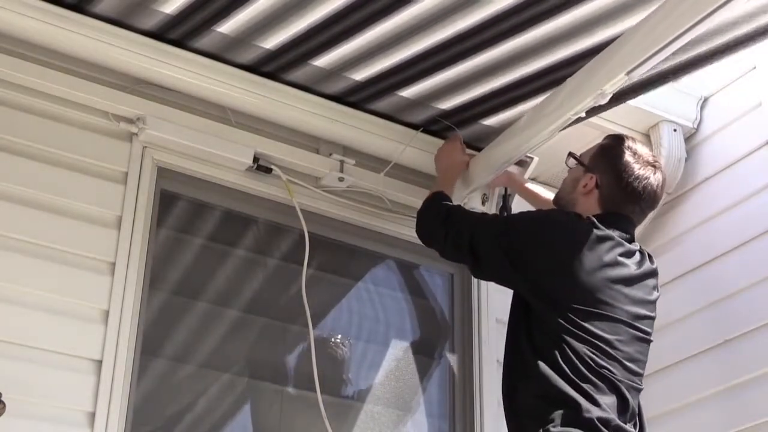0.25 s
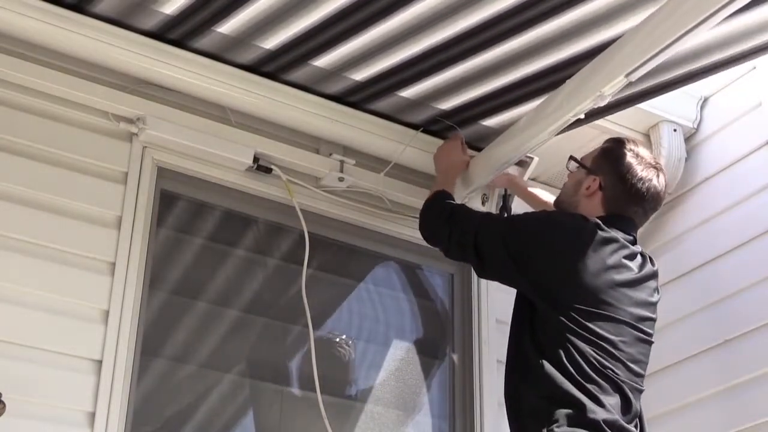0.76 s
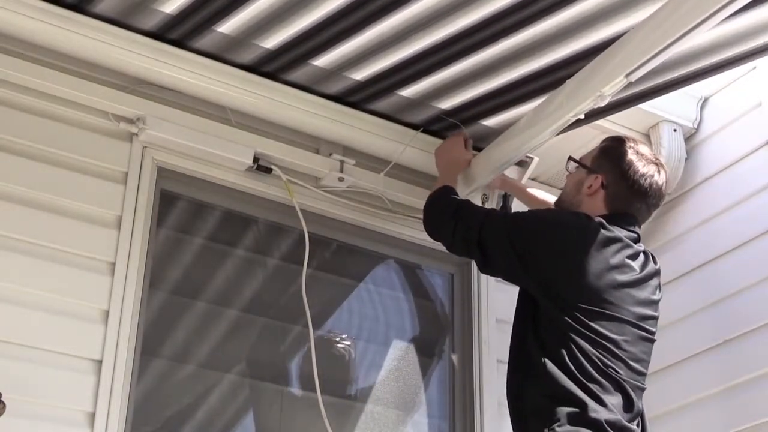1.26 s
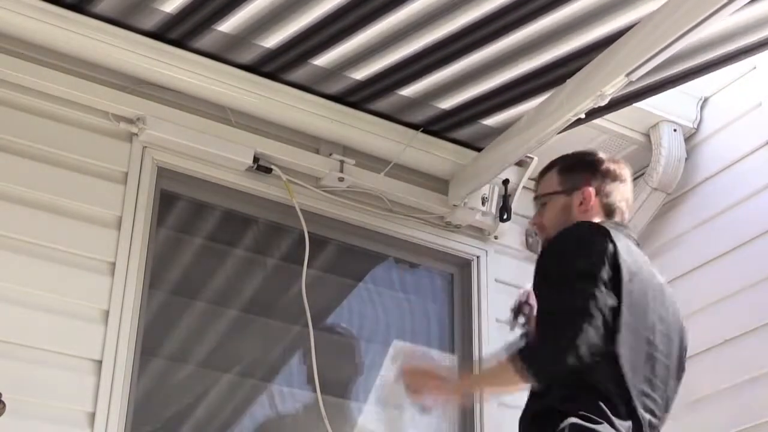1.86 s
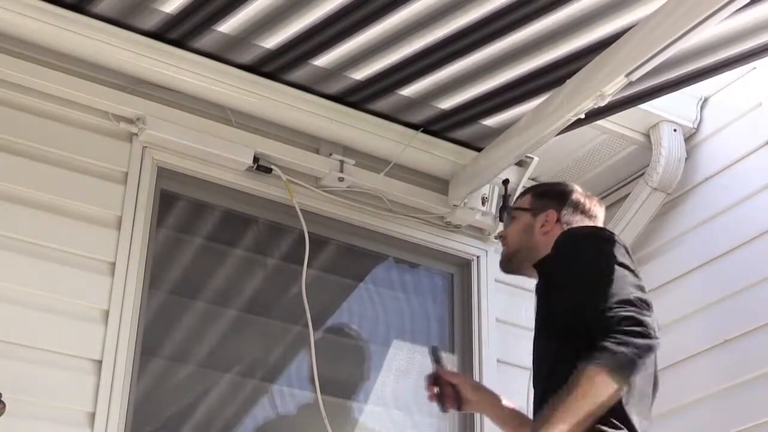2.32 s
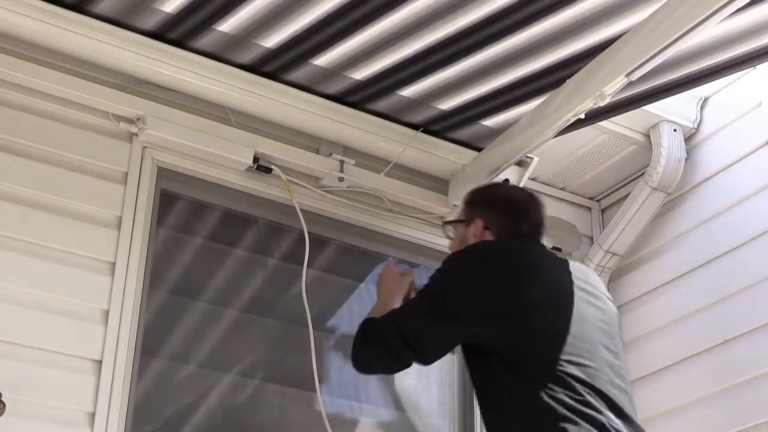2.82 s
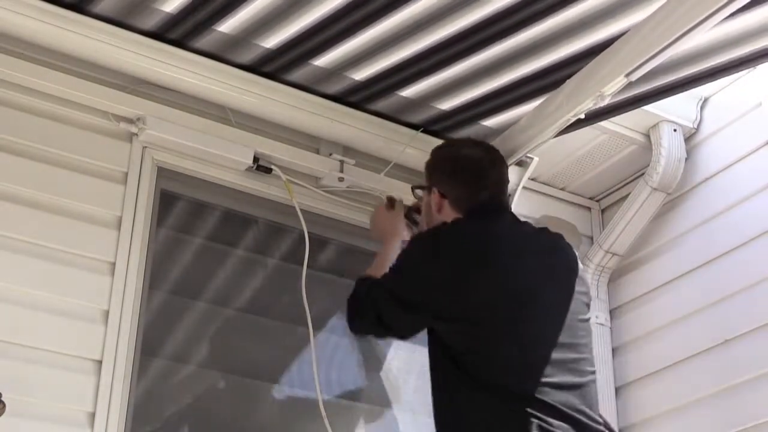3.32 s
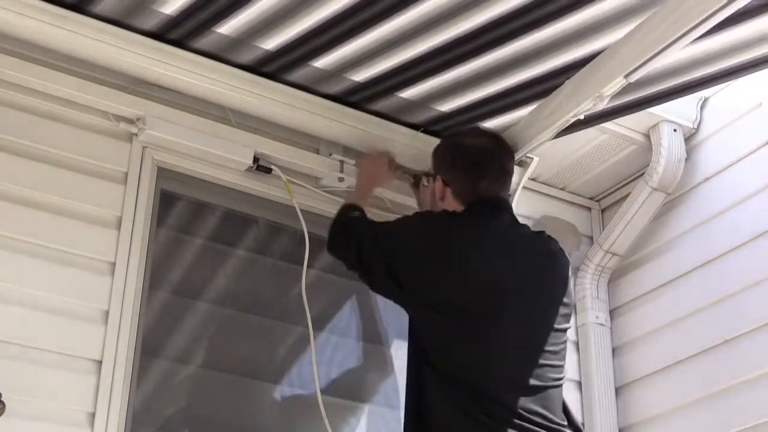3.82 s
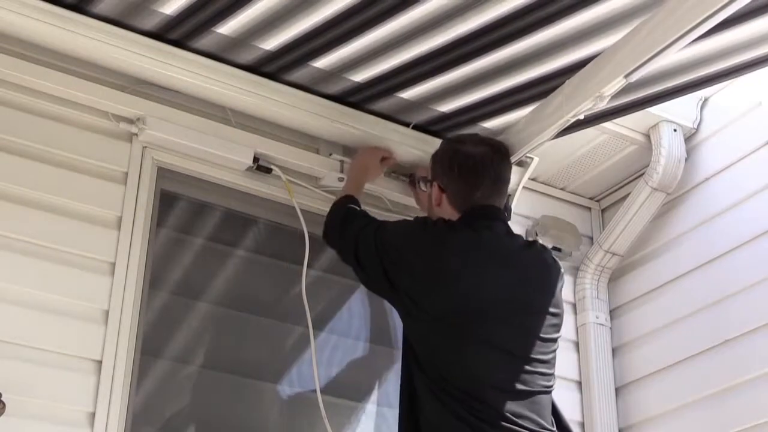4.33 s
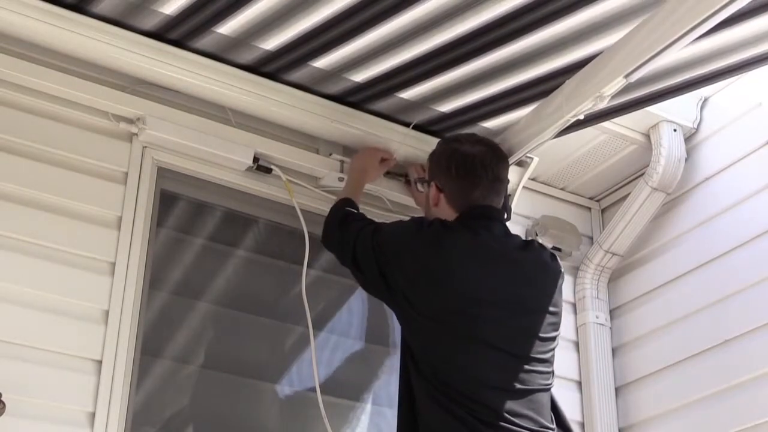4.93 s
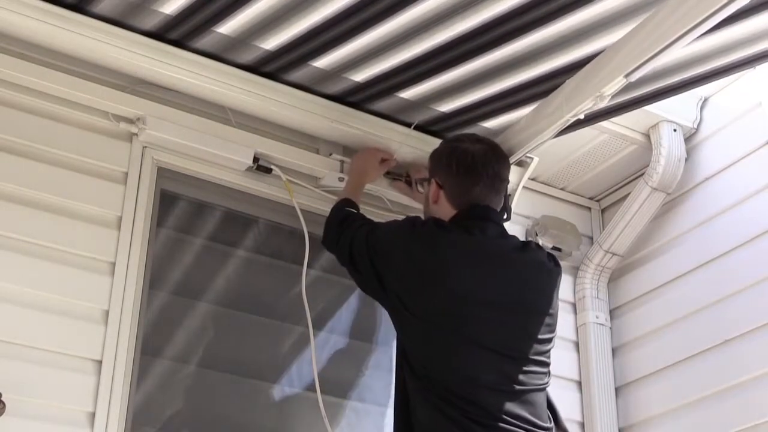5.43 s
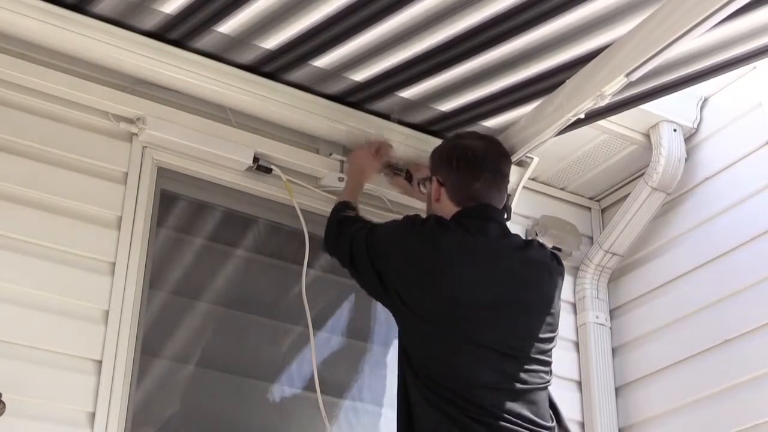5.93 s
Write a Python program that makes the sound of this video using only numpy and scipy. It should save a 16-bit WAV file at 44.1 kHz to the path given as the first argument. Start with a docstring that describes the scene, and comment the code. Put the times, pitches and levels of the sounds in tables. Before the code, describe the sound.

Two sharp, loud snips of plastic ties outdoors, with small handling ticks between them, gusts rumbling on the microphone and faint chirping birds.

```python
"""Cutting plastic ties under an awning

Side cutters snip two ties: noise for the bite, a filtered click for the crack, ringing modes for jaws and trim.
Hands, cable and feet make small taps and scuffs, each a tick with a burst of friction noise.
Wind buffets the microphone ports as shaped noise; flaps and low ringing kicks go with it.
Gliding sines whistle as birds over a blurred far chorus, faint drones, a brief hum and hissing open air."""
import sys
import numpy as np
from scipy import signal
from scipy.fft import rfft, irfft
from scipy.io import wavfile

SR = 44100
rng = np.random.default_rng(int(sys.argv[2]) if len(sys.argv) > 2 else 0)


def digitize_waveform(pressure):
    """Quantize a signal to 16-bit integers and store it at the path in sys.argv[1].

    Rows of a 2-D input are taken as channels; values are limited to [-1, 1].
    """
    field = np.atleast_2d(pressure).T
    bounded = np.clip(field, -1, 1)
    quanta = np.round(bounded * 32767).astype(np.int16)
    wavfile.write(sys.argv[1], SR, quanta)


N = 272097
PORCH_T60_S = 0.22
OPPOSITE = np.array([[1], [-1]])   # left and right in opposite sign


def from_db(db):
    """Decibels to gain."""
    return 10 ** (np.asarray(db) / 20)


def rms_one(x):
    """Scale to rms 1."""
    return x / np.sqrt(np.mean(x ** 2) + 1e-20)


def in_time(rows):
    """Interpolate table columns into sample-rate curves; the first column is time in seconds."""
    s, *columns = np.transpose(rows)
    return [np.interp(np.arange(N) / SR, s, c) for c in columns]


def at_hz(points, hz):
    """Read a spectrum on a log-frequency axis."""
    points_hz, values = np.transpose(points)
    return np.interp(np.log(np.maximum(hz, 1)), np.log(points_hz), values)


def coloured(x, spectrum):
    """Give a signal a spectrum without shifting its phase."""
    hz = np.fft.rfftfreq(x.shape[-1], 1 / SR)
    return irfft(rfft(x) * from_db(at_hz(spectrum, hz)), x.shape[-1])


def causal(x, spectrum):
    """Give a click a spectrum with nothing sounding early (minimum phase, by folding the cepstrum)."""
    hz = np.fft.rfftfreq(len(x), 1 / SR)
    cepstrum = irfft(np.log(from_db(at_hz(spectrum, hz))), len(x))
    cepstrum[1:len(x) // 2] *= 2
    cepstrum[len(x) // 2 + 1:] = 0
    return irfft(rfft(x) * np.exp(rfft(cepstrum)), len(x))


def band(x, low_hz, high_hz):
    """Band-pass."""
    edges = [low_hz, min(high_hz, .45 * SR)]
    return signal.sosfilt(signal.butter(2, edges, "band", fs=SR, output="sos"), x)


def drift(rate_hz):
    """Slow chance of rms 1: noise smoothed by two equal poles, at one fortieth of the sample rate."""
    r = np.exp(-80 * np.pi * rate_hz / SR)
    noise = rng.standard_normal(N // 40 + 2002)
    slow = signal.lfilter([1], [1, -2 * r, r * r], noise)[2000:]
    return np.interp(np.arange(N) / 40, np.arange(len(slow)), rms_one(slow))


def ring(x, hz, t60_s):
    """A two-pole resonance: a unit click sets a sine of starting height 1 ringing."""
    r, w = from_db(-60 / (t60_s * SR)), 2 * np.pi * hz / SR
    return signal.lfilter([0, np.sin(w)], [1, -2 * r * np.cos(w), r * r], x + 1e-18)


def porch(x, t60_s, tail_db, side_db, ragged_db=4.0):
    """Ribbed siding scatters each echo into a few ms of uneven grit; the dense tail fades ever faster."""
    # corner, floor, far wall, then their repeats: delay_s, level_db (before the tail level and 16.5 dB)
    echoes = [(0, -14.5), (0.0105, -18.5), (0.027, -29.5), (0.042, -37), (0.066, -53)]
    # echoes are more unlike at the two ports in the treble: frequency_hz, side_weight_db
    width = [(200, -24.5), (700, -4), (2400, -4.5), (4400, 1), (15000, 0)]
    t = np.arange(int(.5 * SR)) / SR
    envelope = from_db(tail_db - 60 * t / t60_s - 1600 * t ** 2)
    for delay_s, db in echoes:
        envelope += (t >= delay_s) * from_db(db + tail_db + 16.5) * np.exp(-np.abs(t - delay_s) / 0.0047)
    sizes = from_db(ragged_db * np.minimum(rng.exponential(1, len(t)), 4))
    mid, side = rng.standard_normal((2, len(t))) * rms_one(sizes) * envelope
    mid[0], side[0] = 1, 0   # the direct sound
    response = mid + from_db(side_db) * coloured(side, width) * OPPOSITE
    return signal.fftconvolve(np.atleast_2d(x), response, axes=1)[:, :N]


def whistle(rows, waver):
    """A near sine glides quickly, then settles on its last pitch, with soft ends and a slight waver."""
    attack_s, release_s = 0.0035, 0.0055
    fall_settle, rise_settle = 2.2, 1.2   # above 1, a glide is quick at first and levels off
    swell_db = 4   # a note starts this much softer than it ends
    out = np.zeros(N)
    wobble, flutter_db = drift(76), 0.94 * drift(38)
    for s, length_s, first_hz, last_hz, db in rows:
        t = np.arange(round(length_s * SR)) / SR
        span = slice(round(s * SR), round(s * SR) + len(t))
        ends = np.clip(np.minimum(t / attack_s, (length_s - t) / release_s), 0, 1)
        settle = fall_settle if first_hz > last_hz else rise_settle
        hz = last_hz + (first_hz - last_hz) * (1 - t / length_s) ** settle
        phase = 2 * np.pi * np.cumsum(hz * (1 + waver * wobble[span])) / SR
        level = from_db(db - swell_db * (0.5 - t / length_s) + flutter_db[span])
        out[span] += np.sqrt(2) * ends * level * np.sin(phase)
    return out


def air(wash_db, hiss_db):
    """Open air: half-octave bands of stereo noise; low bands follow the wash, high bands the hiss."""
    # stereo width of the low air, narrower early on: start_s, side_db
    low_width = [(0, -5), (0.9, -6), (1.1, 3), (1.5, -15), (2, -1.5), (2.6, 1), (3.4, 5.5), (4, 7),
                 (4.9, 7), (5.1, 4.5), (6.17, 7)]
    # colour of the air: frequency_hz, density_db (per Hz)
    air_colour = [(24, -41), (40, -8.5), (91, -20.5), (290, -8), (354, -3), (516, -3.5), (1070, -2),
                  (1590, -4.5), (2440, -5.5), (3300, -6), (3560, -7.5), (12100, -21.5), (14300, -30),
                  (14900, -50), (15500, -74.5)]
    # left-right likeness: frequency_hz, likeness (1 is identical)
    likeness = [(60, 0.89), (150, 0.97), (380, 1), (650, 0.93), (950, 0.74), (2380, 0.57), (5980, 0.02),
                (15000, 0.84)]
    top_hz = 14700   # the hiss ends here
    out, edges_hz = 0, 40 * 2 ** np.arange(0, 9.1, .5)
    white, (low_side_db,) = rng.standard_normal((2, 2, N)), in_time(low_width)
    for k, (low_hz, high_hz) in enumerate(zip(edges_hz, edges_hz[1:])):
        mid, side = band(white[k % 2], low_hz, high_hz)
        hz = np.sqrt(low_hz * high_hz)
        alike = np.clip(at_hz(likeness, hz), -1, 1)
        share = np.clip(np.log2(hz / 1500) / 2.1, 0, 1)   # 0 follows the wash, 1 the hiss
        level_db = (1 - share) * (wash_db + 11.0) + share * (hiss_db + 18.0)
        gain = from_db(at_hz(air_colour, hz) + level_db + 1.48 * drift(15.0))
        side = from_db((1 - share) * low_side_db) * side * OPPOSITE
        out = out + gain * (np.sqrt(1 + alike) * mid + np.sqrt(1 - alike) * side)
    return signal.sosfilt(signal.butter(10, top_hz, fs=SR, output="sos"), out)


def drones():
    """Faint drones in the air: noise through narrow resonances, each swelling on its own."""
    # pitch_hz, width_hz, level_db (rms, before the swell)
    drone_bands = [(338, 9.6, -67), (452, 19, -77.5), (630, 12, -70.5), (729.6, 8.7, -71.5),
                   (950, 2.8, -75.5)]
    swell_db = 3
    out = 0
    for hz, width_hz, db in drone_bands:
        tone = rms_one(ring(rng.standard_normal(N), hz, 2.0 / width_hz))
        out = out + from_db(db + swell_db * drift(11.0)) * tone
    return out


def hum():
    """A faint low hum comes and goes: a near sine, almost steady in pitch."""
    # start_s, length_s, first_pitch_hz, last_pitch_hz, level_db (rms, around which it swells)
    hum_notes = [(3.87, 0.28, 242, 241, -56.5)]
    return whistle(hum_notes, waver=0.0032)


def chorus(level_db):
    """Many far birds: ten warbling sines swell and fade by chance, blurred by distance."""
    voices = 0
    for hz in (2057, 2216, 2380, 2480, 2526, 2680, 2790, 2890, 3120, 3300):
        swell = from_db(5.2 * drift(24.0))
        warble = 1 + .14 * np.tanh(.6 * drift(13))
        voices = voices + swell * np.sin(2 * np.pi * np.cumsum(hz * warble) / SR)
    return from_db(level_db - 3.0) * rms_one(porch(voices, t60_s=0.79, tail_db=-4.0, side_db=-4.0))


def birds():
    """Songbirds whistle gliding notes, heard directly and through a longer scattered echo."""
    # start_s, length_s, first_pitch_hz, last_pitch_hz, level_db (rms, direct, around which it swells)
    bird_notes = [(0.011, 0.018, 3730, 3350, -57), (0.021, 0.024, 3500, 2640, -51),
                  (0.033, 0.037, 2630, 2614, -43.5), (0.056, 0.035, 2610, 2364, -48.5),
                  (0.068, 0.011, 2380, 2130, -53), (0.07, 0.027, 2640, 2620, -57),
                  (0.076, .026, 2380, 2400, -55), (0.089, 0.016, 2770, 3200, -49),
                  (0.1, 0.046, 3104, 2977, -45.5), (0.136, 0.021, 3020, 3680, -47),
                  (0.18, 0.054, 1916, 2000, -60), (0.232, 0.017, 2800, 2700, -63),
                  (0.285, 0.027, 2640, 2670, -55), (0.312, 0.037, 2480, 2680, -64),
                  (0.315, 0.031, 2380, 2390, -59), (1.145, 0.028, 2310, 2330, -61),
                  (1.175, 0.13, 2610, 2590, -65), (1.735, .035, 1890, 1910, -69),
                  (1.755, 0.023, 3120, 3170, -57), (1.81, 0.034, 2060, 2180, -73),
                  (1.85, 0.03, 2220, 2400, -56.5), (1.878, 0.048, 2410, 2450, -61),
                  (1.86, 0.038, 3760, 3840, -63), (1.945, 0.033, 2690, 2550, -56.5),
                  (1.98, 0.044, 2730, 2880, -60), (2.03, .035, 2270, 2460, -57),
                  (2.035, .045, 3300, 3220, -64), (2.09, 0.021, 2650, 2510, -61),
                  (2.215, 0.028, 2950, 3050, -64), (2.255, 0.023, 3170, 3250, -66),
                  (1.935, 0.13, 2190, 2050, -63), (2.3, 0.027, 2700, 2760, -59),
                  (2.325, 0.085, 2790, 2922, -50), (2.4, 0.027, 2990, 2600, -56),
                  (2.383, 0.033, 3410, 3700, -52), (2.415, 0.031, 3580, 3740, -51),
                  (2.415, 0.044, 2480, 2140, -54.5), (2.47, 0.03, 2160, 2210, -56),
                  (2.485, 0.04, 2520, 3080, -51), (2.52, 0.1, 3100, 2832, -51.5),
                  (2.525, 0.065, 3620, 3010, -54.5), (2.525, 0.051, 2560, 2140, -56),
                  (2.56, .03, 3740, 3760, -62), (2.575, 0.045, 2140, 2300, -56),
                  (2.62, 0.058, 2900, 3110, -56), (2.635, .025, 3970, 4150, -61),
                  (2.68, 0.02, 3570, 3820, -57), (2.705, 0.033, 2450, 2310, -59),
                  (2.875, 0.027, 3500, 3300, -56.5), (2.905, 0.027, 3300, 3060, -65),
                  (2.93, 0.049, 2500, 2720, -56), (2.95, 0.032, 2940, 2940, -56.5),
                  (2.96, 0.025, 2750, 2650, -57), (2.975, 0.021, 3500, 3110, -52),
                  (2.985, .02, 4250, 4330, -65), (3.01, 0.054, 3290, 3540, -53),
                  (3.055, 0.024, 3500, 3870, -56), (3.072, 0.019, 3840, 3430, -57),
                  (3.06, 0.025, 2670, 2630, -54), (3.08, 0.024, 3210, 3340, -55),
                  (3.11, 0.048, 2140, 2170, -66), (3.172, 0.11, 3500, 2837, -53.5),
                  (3.27, 0.038, 2890, 2800, -66), (3.32, 0.017, 2720, 2670, -57),
                  (3.41, 0.081, 2250, 2200, -66), (3.62, .04, 1970, 1940, -63),
                  (3.68, 0.024, 2830, 2680, -64), (3.7, 0.023, 2450, 2320, -61),
                  (3.31, 0.1, 2440, 2330, -62.5), (3.475, 0.034, 2310, 2630, -57),
                  (3.79, 0.028, 3050, 3360, -59.5), (3.8, 0.034, 2380, 2430, -57),
                  (3.89, 0.036, 2190, 2050, -59), (4.015, 0.1, 2040, 2090, -66),
                  (3.875, 0.032, 2780, 3100, -55), (3.905, 0.021, 2800, 2810, -59),
                  (3.935, 0.02, 2950, 2870, -57), (3.97, 0.024, 2970, 3040, -65),
                  (3.995, 0.035, 2480, 2480, -58), (4.04, 0.03, 2480, 2480, -57),
                  (4.035, 0.049, 3100, 2930, -55), (4.105, 0.032, 3010, 3150, -59),
                  (4.118, 0.045, 2480, 2370, -53), (4.19, 0.073, 2420, 2340, -65.5),
                  (4.265, 0.024, 2600, 2480, -59), (4.27, 0.11, 2710, 2820, -69),
                  (4.36, 0.06, 2900, 2580, -62), (4.62, 0.049, 2550, 2750, -67),
                  (4.74, 0.045, 2700, 2540, -65), (4.88, 0.072, 2170, 2380, -63.5),
                  (5.03, 0.022, 2000, 1980, -61), (5.19, 0.044, 3400, 2890, -64),
                  (5.222, 0.053, 2890, 2660, -58.5), (5.32, 0.1, 2840, 2370, -58),
                  (5.37, .04, 2980, 3150, -63), (5.585, 0.048, 3680, 3570, -68),
                  (5.62, 0.024, 2550, 2680, -59), (5.765, 0.022, 2730, 2800, -65),
                  (5.82, 0.025, 2600, 2680, -58)]
    notes = whistle(bird_notes, waver=0.007)
    return notes + from_db(-7.0) * porch(notes, t60_s=0.41, tail_db=-27.0, side_db=2.5)


def buffet_kicks(rows):
    """Each buffet also kicks the membrane, which rings low in four modes of chance size and sign."""
    kick_db, t60_s = -6.5, 0.03
    modes = [(150, -5), (220, 3), (330, -5), (520, -7.5)]   # pitch_hz, level_db
    kicks = np.zeros((4, N))
    for (s, db, _), size in zip(rows, rng.normal(0, 1, (len(rows), 4))):
        kicks[:, round(s * SR)] = from_db(db + kick_db) * size
    knock = sum(from_db(db) * ring(kick, hz, t60_s) for kick, (hz, db) in zip(kicks, modes))
    return band(band(knock, 110, 980), 60, 1060)


def wind():
    """Lumpy rumble and a deep throb common to both ports; higher eddies are of opposite sign."""
    # steady wind: start_s, rumble_db, throb_db, eddies_db (relative to the rumble)
    gusts = [(0.0, -46.5, -68, -42), (0.14, -47, -62, -42), (0.18, -53, -60, -42), (0.23, -48, -58, -44),
             (0.33, -44, -72, -57), (0.62, -48, -59, -46), (0.72, -57.5, -67, -48), (0.8, -51, -59, -53),
             (0.95, -41, -55, -45), (1.2, -44, -57, -33), (1.33, -48, -60, -41), (1.42, -63, -70.5, -31),
             (1.8, -69, -70.5, -34), (2.3, -58.5, -68.5, -33), (2.65, -58, -59, -33),
             (3.05, -58.5, -63.5, -24), (3.6, -60.5, -72, -14), (4.15, -56, -54.5, -15),
             (4.42, -43.5, -52, -9.5), (4.65, -48, -50.5, -12), (4.85, -44.5, -48.5, -10.5),
             (4.97, -53, -53, -20), (5.1, -54, -62, -33), (5.2, -54, -68, -26), (5.3, -46, -54, -27),
             (5.55, -55.5, -64, -40), (5.95, -51.5, -68, -24), (6.02, -62, -75, -22), (6.17, -76, -79, -11)]
    # colour of the rumble: frequency_hz, density_db (per Hz)
    rumble_colour = [(15, -59.5), (25, -29.5), (111, 1.5), (130, 6.5), (323, -2), (543, -16.5),
                     (738, -20.5), (868, -29), (941, -28.5), (1200, -29), (1560, -30.5), (2640, -120)]
    # colour of the eddies: frequency_hz, density_db (per Hz)
    eddy_colour = [(59, -81), (110, -35), (170, -7), (250, -4), (350, 7), (480, 4.5), (700, 4.5),
                   (1000, -6.5), (1500, -15), (1950, -40), (3300, -120)]
    # single thumps of wind: middle_s, peak_db (of the rumble's gain), length_ms (about twice the fall to half)
    buffet_rows = [(0.042, -34.5, 32), (0.15, -40, 12), (0.283, -34, 18), (0.349, -43, 37),
                   (0.41, -32.5, 18), (0.447, -39.5, 25), (0.496, -38, 21), (0.561, -43.5, 36),
                   (0.687, -44.5, 15), (0.762, -36, 3.9), (0.814, -37, 52), (0.925, -49, 19),
                   (1.001, -35, 20), (1.012, -39, 25), (1.037, -31, 15), (1.057, -30.5, 18),
                   (1.242, -41, 18), (1.881, -48.5, 25), (1.947, -51.5, 75), (2.409, -49, 67),
                   (2.458, -47.5, 32), (2.578, -42, 22), (2.68, -51, 29), (2.713, -39.5, 21),
                   (2.754, -44, 43), (2.782, -38, 32), (2.811, -39.5, 26), (2.836, -40.5, 25),
                   (2.871, -50, 34), (2.954, -45, 32), (2.977, -55, 23), (3.532, -53, 45),
                   (4.46, -38.5, 78), (4.508, -35.5, 99), (4.574, -40.5, 28), (4.761, -32, 36),
                   (4.805, -34, 42), (4.937, -43, 17), (5.235, -39, 15), (5.368, -44.5, 29),
                   (5.499, -54, 33), (5.66, -46.5, 34), (5.699, -36.5, 21), (5.725, -41, 37),
                   (5.773, -41.5, 30), (5.812, -41, 14), (5.886, -36, 21), (5.93, -39.5, 26)]
    rise = .6   # a buffet rises in this share of the time it takes to fall
    throb_under_buffet_db = -15.5
    steady_db, throb_db, eddy_db = in_time(gusts)
    t = np.arange(N) / SR
    buffets = np.zeros(N)
    for s, db, length_ms in buffet_rows:
        distance = 1700 * (t - s) / length_ms / np.where(t < s, rise, 1)
        buffets += from_db(db) * np.exp(-distance ** 2)
    gust = np.hypot(from_db(steady_db), buffets)
    deep = np.hypot(from_db(throb_db), from_db(throb_under_buffet_db) * buffets)
    lumps = from_db(1.2 * drift(38))
    rumble = rms_one(lumps * band(coloured(rng.standard_normal(N), rumble_colour), 120, 4500))
    throb = rms_one(band(band(rng.standard_normal(N), 73, 122), 43.7, 105))
    eddies = rms_one(lumps * coloured(rng.standard_normal(N), eddy_colour))
    common = buffet_kicks(buffet_rows) + gust * rumble + deep * throb
    return common + gust * from_db(eddy_db) * eddies * OPPOSITE


def slaps():
    """Gust peaks slap the ports: short dry puffs of middle-band noise with a duller edge, unlike at the two."""
    # middle_s, level_db, half_length_ms (to 1/e)
    slap_rows = [(1.0333, -48, 2.3), (4.498, -37, 1.2), (4.51, -54, 2.2), (4.548, -48, 4.4),
                 (4.624, -48, 1.7), (4.783, -52, 3.9), (4.795, -48, 3.6), (4.811, -54, 3.4),
                 (5.266, -58, 3.7), (5.701, -50, 2.5), (5.708, -45, 1.1), (5.713, -46, 0.98),
                 (5.721, -50, 1.3), (5.722, -47, 2.3), (5.733, -55, 1.1)]
    t = np.arange(N) / SR
    shape = sum(from_db(db) * np.exp(-((1000 * (t - s) / half_ms) ** 2)) for s, db, half_ms in slap_rows)
    bright, dull = rng.standard_normal((2, 2, N))
    puff = rms_one(band(bright, 990, 2200)) + from_db(-9) * rms_one(band(dull, 492, 1300))
    mid, side = shape * puff
    return mid + 1.05 * side * OPPOSITE


def taps():
    """Each contact is a sharp tick and a dying burst of friction noise, with its own balance of three bands."""
    # start_s, treble_db, middle_db, top_db (before the band offsets), contact_ms (decay to 1/e),
    # tick_db (click height relative to the friction)
    tap_rows = [(.089, -55, -64, -52, 22, 8), (1.472, -53, -50.5, -61, 6.5, 12),
                (1.931, -39, -41.5, -62, 5.4, 3), (2.636, -57, -55, -63, 5, 12),
                (2.759, -39, -41, -49, 2.7, 10), (2.765, -38, -42.5, -57, 9.3, 18),
                (2.81, -39.5, -44, -54, 8.1, 8), (2.836, -51, -47, -62, 3.7, 10),
                (2.896, -41, -63, -39, 5.9, 5), (2.9038, -29, -60, -37.5, 2.3, 25),
                (2.906, -27.5, -65, -50, 2.1, 18.5), (3.11, -58, -66, -48, 1, 12),
                (3.1147, -45, -61, -44, .6, 26), (3.178, -47, -69, -56, 8, 10),
                (3.733, -35, -43.5, -51, 5.9, 12), (3.742, -48, -45, -60, 5.7, 10),
                (4.271, -54, -57, -62, 8.5, 8), (4.482, -60, -54, -68, 6.4, 6),
                (6.068, -66, -56, -74, 12, -6), (6.098, -58, -56.5, -64, 87, 10)]
    edges_hz = [(1000, 3500), (3200, 7500), (8000, 13000)]   # middle, treble, top
    friction, ticks, t = np.zeros((3, N)), np.zeros((3, N)), np.arange(N) / SR
    for s, treble_db, middle_db, top_db, contact_ms, tick_db in tap_rows:
        levels = from_db([middle_db + 0.5, treble_db - 9.5, top_db - 3.5])
        decay = (t >= s) * np.exp(-1000 * np.clip(t - s, 0, 1) / max(contact_ms, .3))
        friction += levels[:, None] * decay
        ticks[:, round(s * SR)] += levels * from_db(tick_db)
    grit = rng.standard_normal((3, N))
    out = np.zeros(N)
    for envelope, noise, tick, edges in zip(friction, grit, ticks, edges_hz):
        out += envelope * rms_one(band(noise, *edges)) + band(tick + 1e-18, *edges)
    return out


def snips():
    """The jaws bite, the tie parts with one sharp crack, the trim rings and the jaws clap shut."""
    # start_s, crack_peak_db, pan_db, tilt_db (per octave about 4 kHz), bite_db, fizz_db (above 12 kHz),
    # clap_db, clap_top_db (extra above 12 kHz), clap_late_ms (after the crack)
    snip_rows = [(1.267, -6.5, -0.5, -0.4, -20.5, -3.5, 5, -6, .7),
                 (5.8608, -5.5, 0.5, -1.5, -33, 0.5, -3, 27, .05)]
    # colour of the crack: frequency_hz, density_db (per Hz)
    crack_colour = [(240, -67.5), (400, -16), (941, -17.5), (1150, -12.5), (1600, -3), (1810, 6), (2510, 4),
                    (2800, -2), (3400, -0.5), (4000, -0.5), (4680, 6.5), (5640, 1.5), (8850, 3.5),
                    (11000, -0.5), (14300, -5), (15700, -9.5), (16700, -43.5)]
    # metal trim under the tie: pitch_hz, level_db (before the chance spread), t60_s
    trim_modes = [(416, -41, 0.15), (628, -46.5, 0.2), (948, -38.5, 0.19), (1300, -37.5, 0.22),
                  (1755, -20.5, 0.13), (2170, -14, 0.13), (2510, -14, 0.09), (3430, -35, .12),
                  (5280, -23.5, .12), (2880, -29, 0.11), (3822, -30.5, .15), (4660, -21.5, 0.055),
                  (5660, -34, .13), (6100, -40.5, 0.097), (7460, -28, 0.11), (8340, -25, 0.067),
                  (8660, -37.5, 0.077)]
    # jaws clapping shut: pitch_hz, level_db (before each snip's clap levels), t60_s
    jaw_modes = [(7000, -8, .012), (8880, -9, .012), (13900, -24, .008), (3500, -29, 0.053),
                 (1813, -26.5, .03), (4670, -22, .025)]
    trim_spread_db = 2   # each snip strikes the modes a little differently
    bite_s = 0.0052   # the jaws crush into the plastic this long before it parts
    lead = 512   # samples kept ahead of the crack
    out = np.zeros((2, N))
    click = (np.arange(SR // 4) == lead) * -1.
    progress = (np.arange(len(click)) - lead) / SR / bite_s + 1   # 0 to 1 through the bite
    for s, db, pan_db, tilt_db, bite_db, fizz_db, clap_db, top_db, late_ms in snip_rows:
        crush = rms_one(band(rng.standard_normal(len(click)), 1100, 5800))
        bite = from_db(bite_db) * (progress > 0) * (progress < 1) * np.abs(progress) ** .4 * crush
        colour = [(hz, d + tilt_db * np.log2(hz / 4000) + fizz_db * (hz > 12000)) for hz, d in crack_colour]
        crack = causal(click, colour)
        rings = np.zeros(len(click))
        for k, (hz, mode_db, t60_s) in enumerate(trim_modes):
            strike = from_db(mode_db + trim_spread_db * rng.normal())
            rings += (-1) ** k * strike * ring(click, hz, t60_s)
        clap = sum(from_db(d + clap_db + top_db * (hz > 12000)) * ring(click, hz, t60_s)
                   for hz, d, t60_s in jaw_modes)
        clap = band(np.roll(clap, round(late_ms * SR / 1000)), 870, 18200)
        dry, i = np.zeros(N), round(s * SR) - lead
        dry[i:i + len(click)] = from_db(db) * crack / np.abs(crack).max()
        # only the crack excites the porch, with fresh echoes for each snip
        heard = porch(dry, PORCH_T60_S, tail_db=-16.5, side_db=-7.5)
        heard[:, i:i + len(click)] += from_db(db) * (rings + clap + bite)
        out += from_db(pan_db * np.array([[.5], [-.5]])) * heard
    return out


def scene():
    """Sum all sources, with the taps and snips sounding in the porch."""
    # open air: start_s, wash_db, hiss_db, chorus_db (each before its source's own offset)
    air_levels = [(0.0, -52.5, -55.5, -62), (0.5, -57, -55.5, -55), (1.18, -53.5, -57.5, -62),
                  (1.67, -58, -62, -60.5), (1.86, -61, -62, -54), (2.08, -54.5, -58.5, -66),
                  (2.51, -52.5, -59, -49), (3.0, -53.5, -59, -53), (3.4, -56, -61, -56.5),
                  (3.95, -53, -62.5, -51.5), (4.45, -57, -63, -53), (5.03, -59.5, -62.5, -59.5),
                  (5.77, -61, -62.5, -53.5), (5.91, -61, -61, -58), (6.05, -67, -67, -64),
                  (6.17, -68, -70, -59)]
    wash_db, hiss_db, chorus_db = in_time(air_levels)
    far = air(wash_db, hiss_db) + drones() + hum() + chorus(chorus_db)
    near = porch(taps(), PORCH_T60_S, tail_db=-30, side_db=-3.5) + snips()
    return far + birds() + wind() + slaps() + near


def record(dry):
    """The microphone drops the deepest bass, peaks clip at 0.76 of full scale, then the top is cut."""
    cutoff_hz = 16650
    heard = signal.sosfilt(signal.butter(2, 40, "high", fs=SR, output="sos"), dry)
    clipped = np.clip(heard, -.76, .76)
    return signal.sosfilt(signal.ellip(12, .3, 90, cutoff_hz, fs=SR, output="sos"), clipped)


dry = scene()
out = record(dry)
digitize_waveform(out)
```